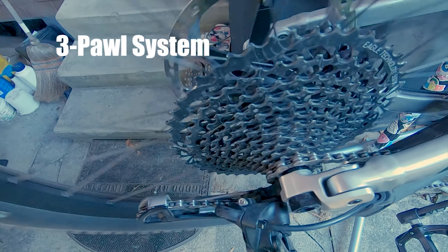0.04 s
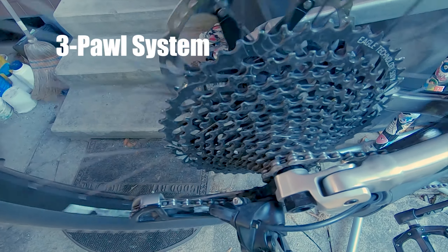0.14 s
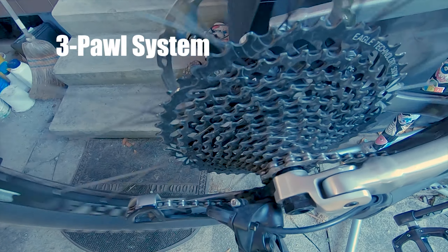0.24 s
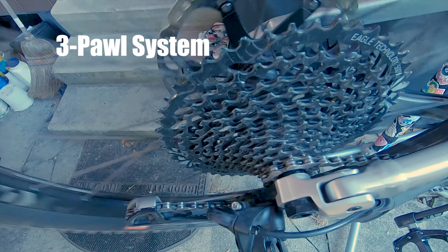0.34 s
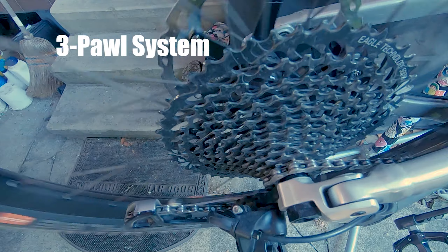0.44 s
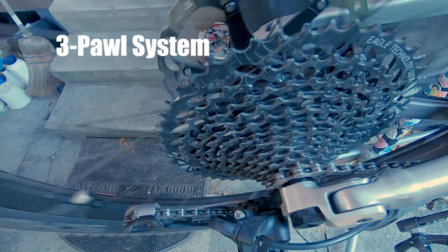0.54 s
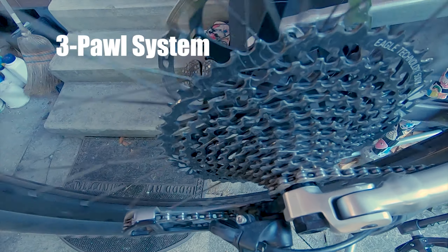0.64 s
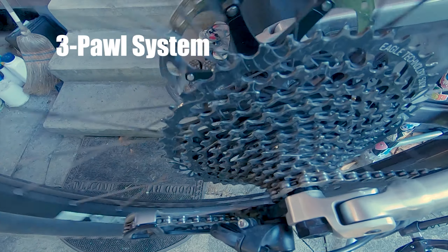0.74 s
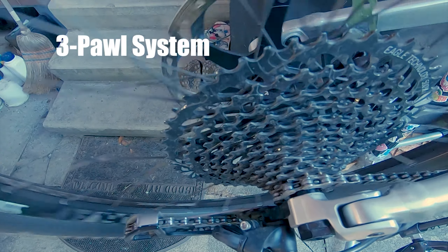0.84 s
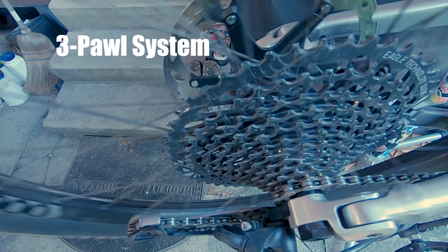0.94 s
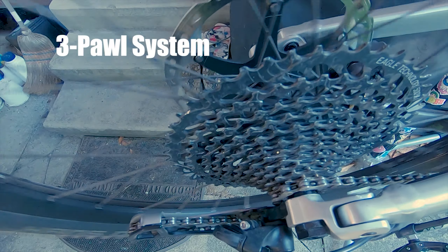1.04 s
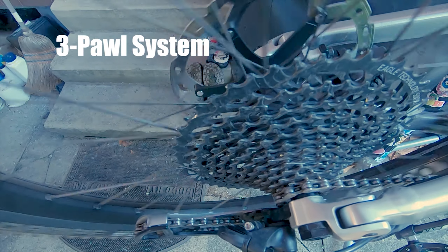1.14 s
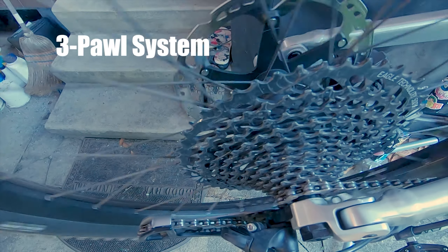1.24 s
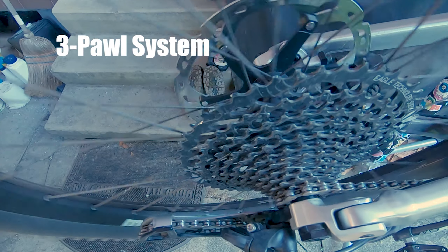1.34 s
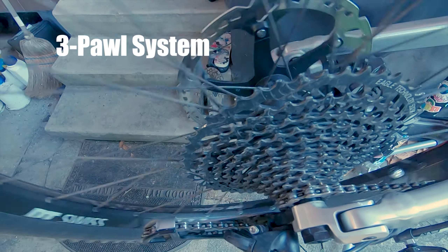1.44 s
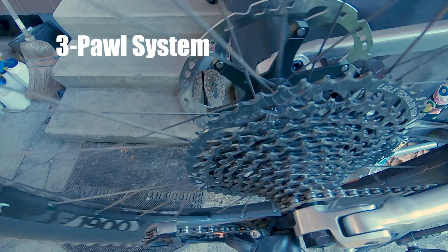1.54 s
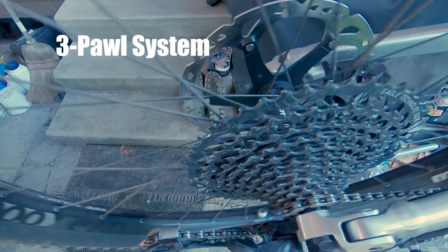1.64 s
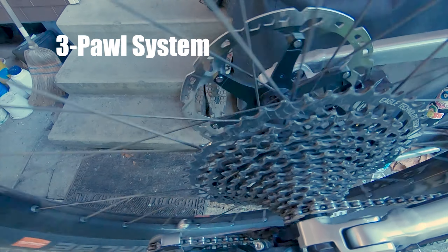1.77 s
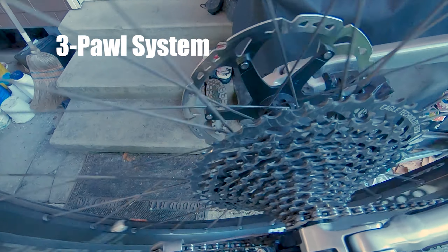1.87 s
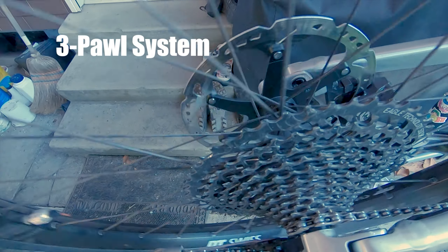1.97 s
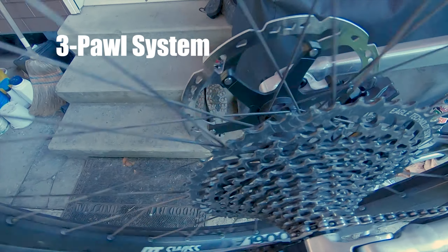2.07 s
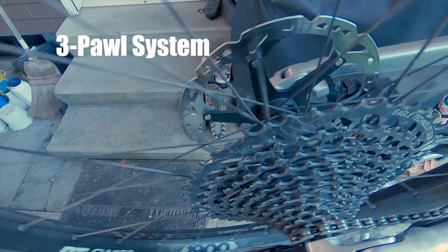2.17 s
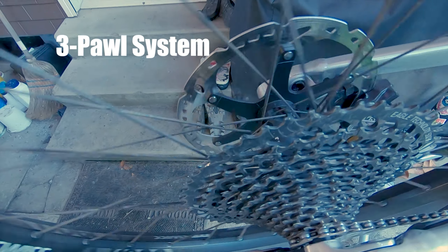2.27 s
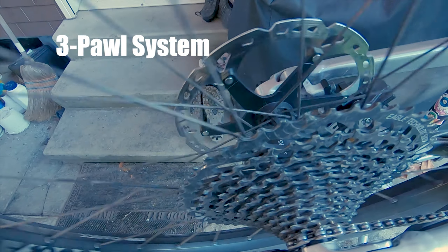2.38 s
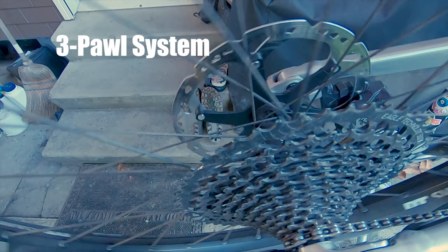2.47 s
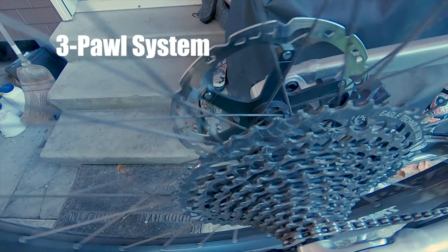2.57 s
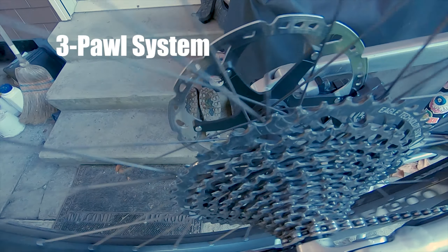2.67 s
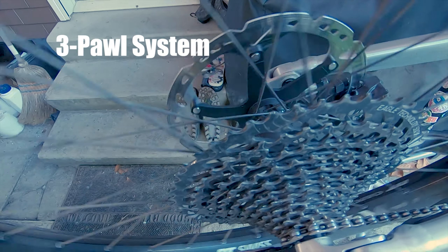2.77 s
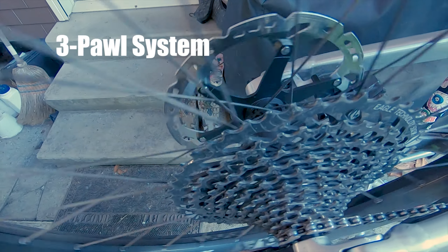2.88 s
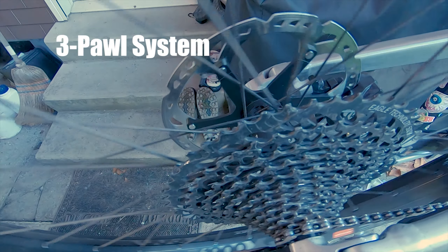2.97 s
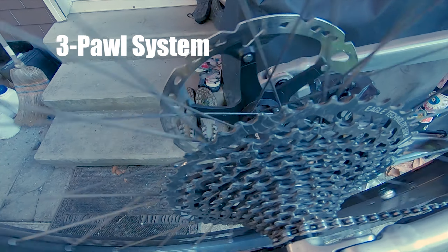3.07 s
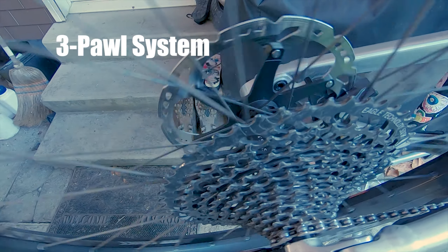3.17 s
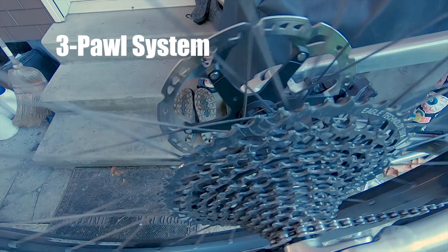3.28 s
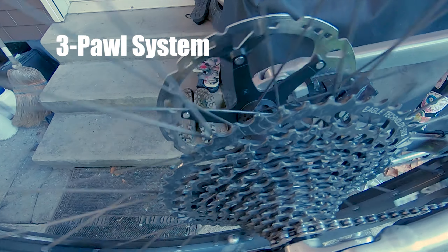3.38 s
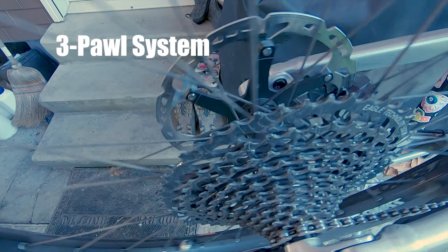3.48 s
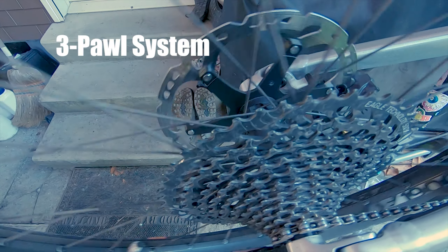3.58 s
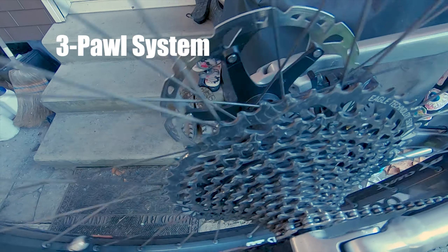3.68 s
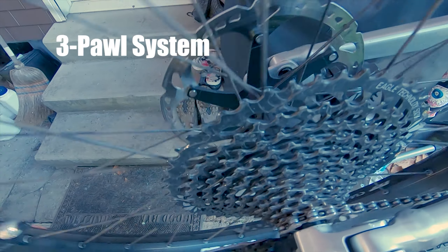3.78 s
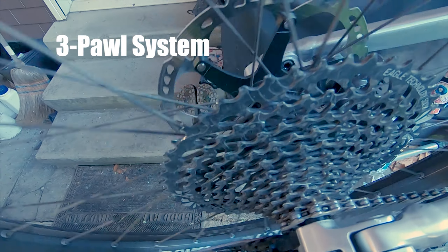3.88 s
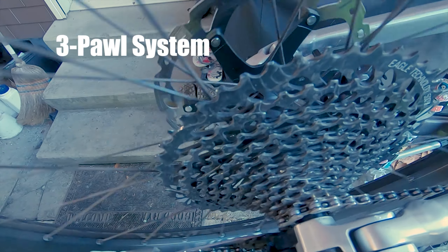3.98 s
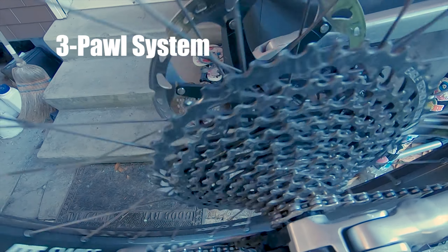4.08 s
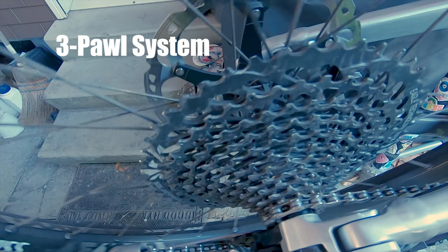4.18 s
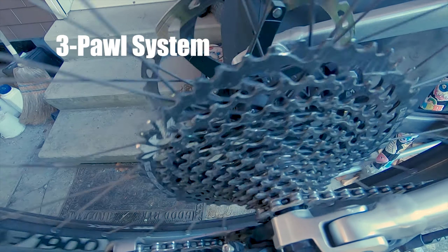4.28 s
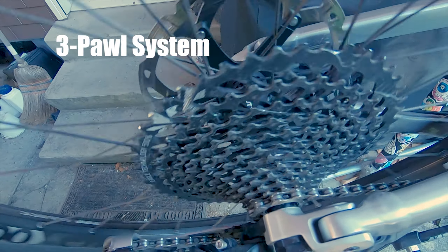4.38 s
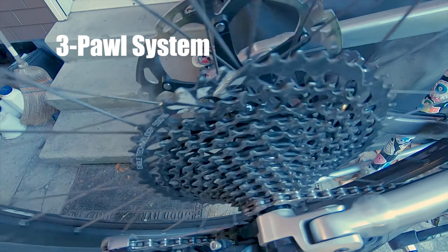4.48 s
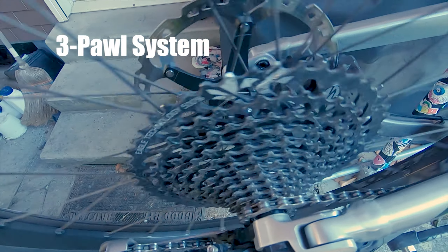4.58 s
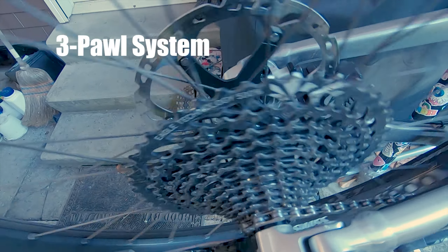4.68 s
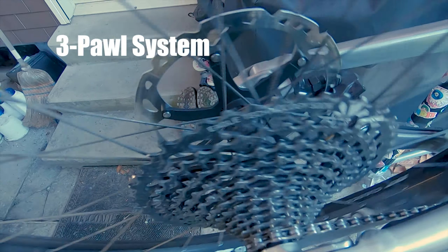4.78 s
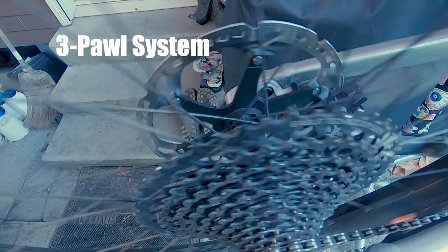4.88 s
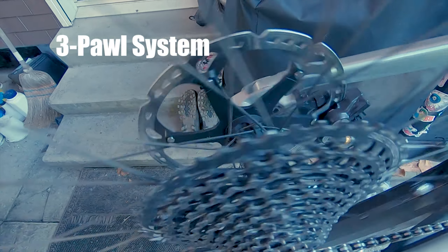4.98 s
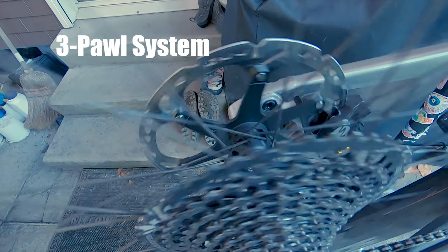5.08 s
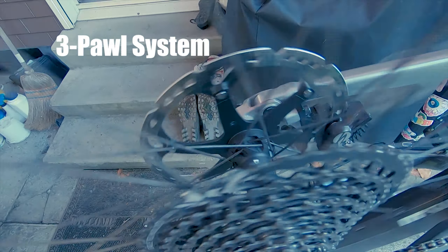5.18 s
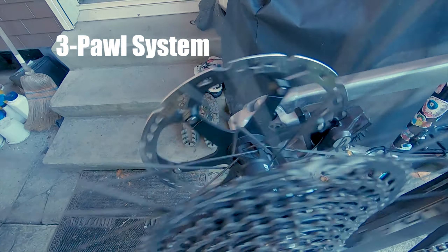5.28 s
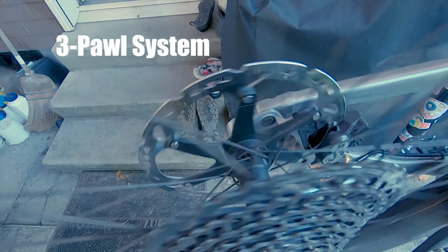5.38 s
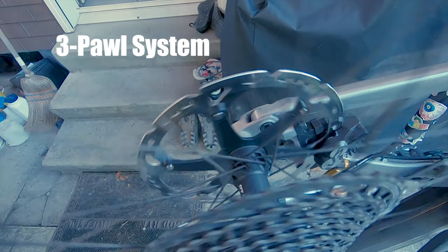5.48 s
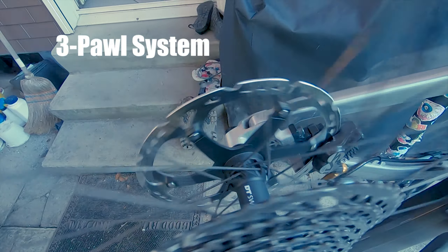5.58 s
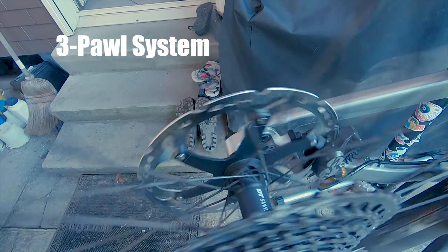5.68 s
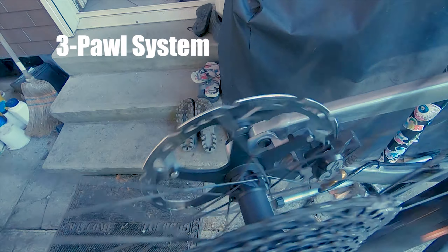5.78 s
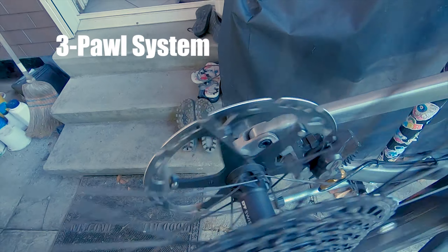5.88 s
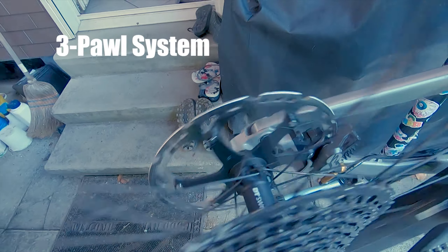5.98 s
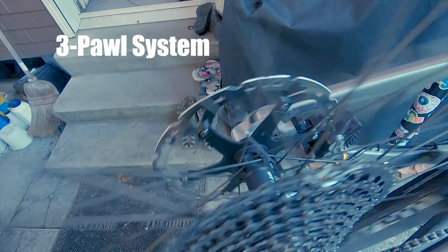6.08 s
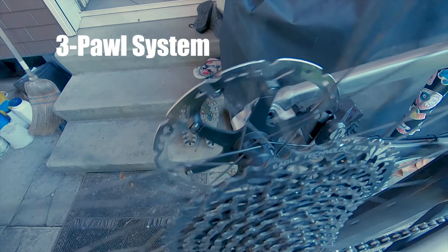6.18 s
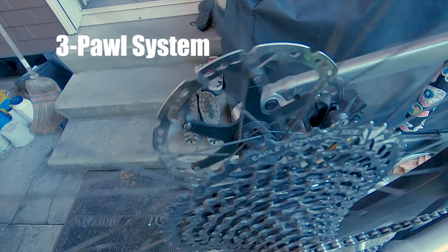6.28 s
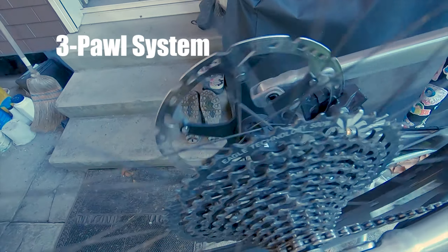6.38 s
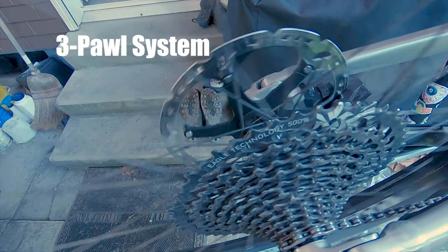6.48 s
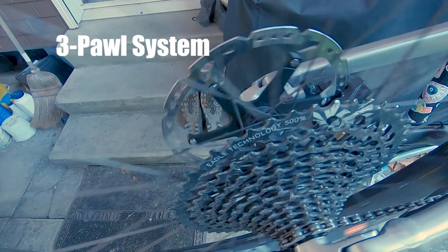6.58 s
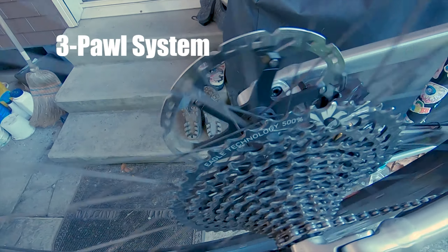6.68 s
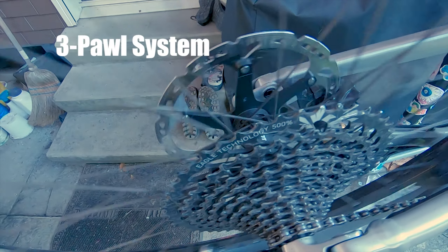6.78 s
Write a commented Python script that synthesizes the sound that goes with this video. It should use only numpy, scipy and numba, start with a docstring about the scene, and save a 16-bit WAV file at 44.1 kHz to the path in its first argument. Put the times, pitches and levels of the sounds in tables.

```python
"""Outdoors, a bicycle rear wheel freewheels close to a handheld camera: pawls snap and ring the wheel.
Fingers bump and rub the camera body; then the pedals drive the wheel, the chain ticks and rustles,
the frame rings low, and the hub freewheels again. Outdoor air, hum, a distant idling engine and wind
lie underneath. Hits start decaying tones and fading noise; air and wind are filtered noise.
Both channels hear almost the same."""
import sys
import numpy as np
from scipy import signal
from scipy.fft import rfft, irfft
from scipy.io import wavfile
from scipy.ndimage import uniform_filter1d
from numba import njit

SR = 44100
rng = np.random.default_rng(int(sys.argv[2]) if len(sys.argv) > 2 else 0)


def waveform_to_disk(signal):
    """Save audio, clipped to [-1, 1], as 16-bit WAV at the path in sys.argv[1]."""
    frames = np.transpose(np.atleast_2d(signal))
    scaled = np.clip(frames, -1, 1) * 32767
    samples = np.round(scaled).astype(np.int16)
    wavfile.write(sys.argv[1], SR, samples)


def how_loud(loudness_db):
    """Turn decibels into a plain amplitude multiplier (0 dB gives 1, 20 dB gives 10)."""
    steps = np.asarray(loudness_db, float) / 20
    return 10 ** steps


N = 301203
T = np.arange(N) / SR  # time in s

# four pitch regions of the wheel's sound: centre_hz, pawl_db, rattle_t60_s, rattle_db,
# ring_t60_s, ring_db, clear_modes_db (t60 is the time to fade by 60 dB)
REGIONS = [(2400, 9, 0.022, -7, 0.26, -6, -4.5), (4290, -1.5, 0.006, 2, 0.17, -10, -9.5),
           (7900, -5, 0.016, 0.5, 0.16, -2, -3), (11330, -24, 0.012, 2, 0.11, -3, -23)]
# random difference in colour from hit to hit
COLOUR_SCATTER_DB = 1.6


def curve(points):
    """Draw straight lines through a time table: one value per sample for each column."""
    s, *columns = np.transpose(points)
    return [np.interp(T, s, column) for column in columns]


def colour(x, points, weight=1):
    """Filter a sound by a table of pitch_hz, level_db, times an optional extra gain."""
    hz = np.fft.rfftfreq(N, 1 / SR) + 1
    point_hz, point_db = np.transpose(points)
    gain = how_loud(np.interp(np.log(hz), np.log(point_hz), point_db))
    return irfft(rfft(x) * gain * weight, N)


def unit(x):
    """Scale to an rms level of 1."""
    return x / np.sqrt(np.mean(x ** 2))


def decay(x, t60):
    """Each impulse starts an exponential fade that loses 60 dB in t60 seconds."""
    return signal.lfilter([1], [1, -np.exp(-np.log(1000) / (t60 * SR))], x)


def mode(x, hz, t60):
    """A resonance set ringing by x; it loses 60 dB in t60 seconds."""
    turn_and_fade = np.exp(2j * np.pi * hz / SR - np.log(1000) / (t60 * SR))
    return signal.lfilter([1], [1, -turn_and_fade], x + 0j).imag


def strikes(times, sizes):
    """Single-sample hits at the given times."""
    at = np.clip((np.asarray(times) * SR).astype(int), 0, N - 1)
    return np.bincount(at, sizes, N)


def walk(rate):
    """Random wandering: a new level rate times per second, smoothed twice."""
    k = int(SR / rate)
    steps = np.repeat(rng.standard_normal(N // k + 1), k)
    return uniform_filter1d(uniform_filter1d(steps, k), k)[:N]


def lines(table, waver_db, drift):
    """Steady tones (pitch_hz, level_db) that waver a little in level and phase."""
    out = 0
    for hz, db in table:
        level = how_loud(db + waver_db * walk(3.3))
        out = out + level * np.sin(2 * np.pi * hz * T + drift * walk(4))
    return out


def air():
    """Distant outdoor noise, hum and an idling engine; wind pushes on the microphone very low down."""
    # how loudly air and hum come through, dipping and rising: time_s, level_db
    air_level = [(0, -36.5), (.15, -44.5), (.6, -40.5), (1.15, -42), (1.2, -65), (1.45, -41.5), (1.9, -42),
                 (2.25, -46.5), (3, -45), (3.9, -42), (4.15, -44), (4.28, -40), (5, -38), (6.2, -37.5),
                 (6.41, -47), (6.83, -49)]
    # tone colour of the air: pitch_hz, relative level_db
    air_colour = [(18, 3.5), (30, 9.5), (65, -12.5), (113, -17), (176, -14), (445, -20), (959, -22.5),
                  (1460, -25.5), (2990, -31), (4330, -31), (5940, -38), (15000, -45.5), (16700, -59)]
    # hum: pitch_hz, level_db against the air
    hum_lines = [(70, -4), (137, -5.5), (155, -11.5)]
    # how loudly the distant engine comes through, before 3 dB is added: time_s, level_db
    idle_level = [(0, -51), (2, -56), (3.5, -46), (4.2, -45), (4.6, -35), (6.2, -38.5), (6.5, -45),
                  (6.83, -64)]
    # engine tones: pitch_hz, relative level_db
    idle_lines = [(104, -3), (208, -15)]
    # how loudly the wind comes through, before the chance gusts: time_s, level_db
    wind_level = [(0, -15), (.4, -39), (1.1, -41.5), (1.4, -58), (1.57, -10), (1.9, -42), (2.04, -20),
                  (2.25, -33.5), (3.5, -29), (3.95, -33.5), (4.5, -31.5), (5.3, -39.5), (5.8, -30),
                  (6.41, -24), (6.83, -27)]
    gust_db, gusts_per_s = 8.5, 4
    wind_colour = [(2, -3.5), (8, 0.0), (20, -12.5), (45, -28.0), (120, -40.0), (300, -62.5)]

    air_db = curve(air_level)[0]
    wind_db = curve(wind_level)[0] + gust_db * walk(gusts_per_s)
    far = unit(colour(rng.standard_normal(N), air_colour)) * how_loud(7.0 + 1.15 * walk(7.7))
    wind = unit(colour(rng.standard_normal(N), wind_colour))
    engine = how_loud(curve(idle_level)[0] + 3) * lines(idle_lines, 2., 1.5)
    hum = lines(hum_lines, 2.5, 3.)
    return how_loud(air_db) * (far + hum) + engine + how_loud(wind_db) * wind


def clicks():
    """One click for each tooth passed; every tooth differs a little in strength and colour."""
    # two freewheeling spells; a pawl drops at the first row and every tooth after: time_s, teeth_per_s
    coast = [(0.0064, 27.594), (0.213, 21.773), (0.358, 24.093), (0.525, 18.742), (0.525, 19.835),
             (1.124, 18.321), (1.368, 17.755), (1.998, 15.288), (2.885, 13.932), (3.466, 12.155),
             (3.672, 11.474), (4.017, 10.926), (4.13, 6.025)]
    coast_again = [(6.2961, 27.871), (6.354, 40.448), (6.46, 39.41), (6.471, 41.872), (6.569, 37.636),
                   (6.68, 30.129), (6.83, 30.115)]
    # how the clicks arrive, dipping after the bumps: time_s, level_db, low_region_db, middle_region_db
    arrival = [(0, 0, -18, -10.5), (.55, 1.5, -19.5, -14.5), (.8, 2, -14.5, -11.5), (1.16, 1, -21, -14.5),
               (1.2, -4.5, -19, -13), (1.3, -8, -20.5, -14), (1.5, -5.5, -16.5, -12.5),
               (1.76, 4, -21.5, -17.5), (1.85, -2.5, -17.5, -13), (1.95, -1.5, -25, -7.5),
               (2.3, 1, -22.5, -10.5), (2.9, 3, -24, -11.5), (3.3, 2, -22.5, -12), (4.13, 3, -22.5, -8),
               (6.29, 7, -20.5, -14), (6.45, -2, -25.5, -11), (6.6, -0.5, -21.5, -17),
               (6.83, -1.5, -25.5, -10)]
    # the two upper regions: level_db of each
    upper_regions_db = (-19, -15.5)
    tooth_scatter_db = .6

    s = []
    for spell in (coast, coast_again):
        inside = (T >= spell[0][0]) & (T <= spell[-1][0])
        teeth = np.cumsum(curve(spell)[0][inside]) / SR
        s += list(np.interp(np.arange(int(teeth[-1]) + 1), teeth, T[inside]))
    at = (np.array(s) * SR).astype(int)
    level_db, low_db, middle_db = (column[at] for column in curve(arrival))
    chance = rng.standard_normal((len(s), 5)).T
    regions_db = (low_db, middle_db, *upper_regions_db)
    coloured = [db + COLOUR_SCATTER_DB * c for db, c in zip(regions_db, chance[1:])]
    return np.array([s, level_db + tooth_scatter_db * chance[0], *coloured])


def many_modes(count, width_hz, scatter_db):
    """Gain over frequency of a thicket of narrow resonances: spokes, sprockets, disc."""
    hz = np.fft.rfftfreq(N, 1 / SR)
    chance = rng.random((count, 2))
    gain = np.full(len(hz), .05)
    for f, size in zip(1200 + 15000 * chance[:, 0], how_loud(scatter_db * chance[:, 1])):
        near = slice(int((f - 200) * N / SR), int((f + 200) * N / SR))
        gain[near] += size / (1 + ((hz[near] - f) / width_hz) ** 2)
    return gain


def struck(modes, region, s, size, scatter_db):
    """Ring the modes nearest to one region, each struck a little differently every time."""
    centres = np.log([r[0] for r in REGIONS])
    out = 0
    for hz, db, t60 in modes:
        if np.argmin(abs(np.log(hz) - centres)) == region:
            delay, strength, sign = rng.standard_normal((len(s), 3)).T
            size_here = size * how_loud(db + scatter_db * strength)
            # a light first touch, then the full blow a moment later
            touch = strikes(s - .0002, .3 * size_here)
            blow = strikes(s + .0007 + .0004 * abs(delay), size_here * np.sign(sign))
            out = out + mode(touch + blow, hz, t60)
    return out


def rattle(events, region, lag_s, late_db, t60, thicket=1):
    """Noise in the wheel's colour that starts at each hit, at its two bounces, and fades."""
    # tone colour of the wheel: pitch_hz, relative level_db
    wheel_colour = [(710, -47), (1200, -18.5), (1900, -15), (2340, -10), (2800, -5), (3970, -2.5),
                    (4380, 3.5), (5700, -11), (6080, -12.5), (6940, -10.5), (10400, -5), (11200, 1.5),
                    (12300, -8), (15600, -15.5), (16500, -66)]
    # event rows: time in s, level in dB, then the level in each region in dB
    s, size = events[0], how_loud(events[1] + events[2 + region])
    late = rng.random((len(s), 2)).T
    hits = strikes(s + 0.00071, size)
    for j in (0, 1):
        hits = hits + strikes(s + lag_s * (j + late[j]), size * how_loud(late_db))
    # each region fades into its neighbours
    log_hz = np.log(np.fft.rfftfreq(N, 1 / SR) + 1)
    share = np.interp(log_hz, np.log([r[0] for r in REGIONS]), np.eye(len(REGIONS))[region])
    noise = unit(colour(rng.standard_normal(N), wheel_colour, np.sqrt(share) * thicket))
    return uniform_filter1d(decay(hits, t60), size=30) * noise


def hub():
    """Each pawl snap is a short clack and rattle; then the whole wheel rings on."""
    # short modes of pawl and ratchet ring: pitch_hz, level_db, t60_s
    pawl_modes = [(2395, -23.5, 0.17), (2800, -13, 0.053), (3665, -6, 0.02), (4310, 0, 0.026),
                  (4463, -3, 0.032), (4877, -3.5, 0.018), (6640, -7.5, 0.072), (7640, -29, 0.022),
                  (8400, 2.5, 0.011), (11220, -10, 0.025), (11560, 20.5, 0.011), (13700, -18, 0.0056),
                  (16800, -17, 0.011)]
    # hub, sprocket and spoke modes that stand out: pitch_hz, level_db, t60_s
    hub_modes = [(2438, -18, 0.3), (2799, -5, 0.17), (2874, -10, 0.25), (3719, -13, 0.34),
                 (4252, -11, 0.33), (4419, -8, 0.25), (4947, -8, 0.21), (5092, -13, 0.3), (5516, 0, 0.13),
                 (5625, -18, 0.43), (5808, -20, 0.38), (6723, -15, 0.26), (7219, -12, 0.32),
                 (7332, -17, 0.49), (7412, -11, 0.34), (8123, -16, 0.25), (8833, -13, 0.27),
                 (8979, -9, 0.17), (9092, -7, 0.17), (9259, -7, 0.16), (9340, -4, 0.15), (9829, -18, 0.29),
                 (9937, -12, 0.26), (10039, -17, 0.33), (10879, -9, 0.16), (11536, -4, 0.15),
                 (12747, -20, 0.23), (13463, -17, 0.14), (14712, -20, 0.16), (14895, -19, 0.14)]
    # how much of the wheel's ring reaches the camera as it moves about: time_s, level_db
    facing = [(0, -5.5), (1.2, -9.3), (2.2, -5.7), (4.2, -6), (6.3, -6.5), (6.83, -8.5)]

    events = clicks()
    facing_db = curve(facing)[0]
    thicket = many_modes(count=320, width_hz=20., scatter_db=11.)
    out = 0
    for k, (hz, pawl_db, fast_t60, fast_db, ring_t60, ring_db, clear_db) in enumerate(REGIONS):
        size = how_loud(events[1] + events[2 + k])
        out = out + how_loud(pawl_db) * struck(pawl_modes, k, events[0], size, 2.)
        out = out + how_loud(clear_db + facing_db) * struck(hub_modes, k, events[0], size, 3.5)
        out = out + how_loud(fast_db) * rattle(events, k, .003, -9., fast_t60)
        out = out + how_loud(ring_db + facing_db) * rattle(events, k, .003, -20., ring_t60, thicket)
    # the wheel's sound is thinned below about 1.5 kHz
    return signal.sosfilt(signal.butter(2, 1500., "high", fs=SR, output="sos"), out)


def strokes():
    """Loudness of fingers sliding on the body: each stroke swells, holds and fades."""
    # strokes: start_s, length_s, level_db
    stroke_table = [(1.207, .09, -35), (1.363, 0.041, -32.5), (1.432, 0.036, -28.5), (1.497, 0.077, -22.5),
                    (1.574, 0.13, -30), (1.718, 0.093, -33), (2.011, 0.028, -31)]
    edge_s = .022
    out = 0
    for s, length, db in stroke_table:
        to_edge_s = np.minimum(T - s, s + length - T)
        out = out + how_loud(db) * np.clip(to_edge_s / edge_s + .5, 0, 1) ** 2
    return out


def handling():
    """Bumps flex the camera shell, mostly dropping in pitch as contact spreads; fingers stick and slip."""
    # bumps and creaks of the camera body:
    # start_s, level_db, first_pitch_hz, last_pitch_hz, time_to_peak_s, abruptness (no unit)
    bumps = [(1.1796, 10, 943, 99, 0.00367, 0.87), (1.2672, 0.5, 410, 303, 0.0024, 0.82),
             (1.364, -17.5, 610, 322, 0.0026, 2.4), (1.429, -9.5, 715, 269, 0.0019, 1.5),
             (1.47, -18.5, 60, 45, 0.0057, 2.1), (1.75, -19.5, 300, 152, 0.0039, 2.2),
             (1.822, -16, 294, 168, 0.0016, 2), (1.8542, -1.5, 616, 442, 0.0039, 6.1),
             (2.009, -27, 490, 513, 0.01, 1.4), (2.018, -23.5, 252, 237, 0.013, 1.8),
             (4.226, -22.5, 930, 520, 0.0018, 4.1)]
    # resonances of the body: pitch_hz, width_hz, relative level_db
    body = [(260, 220, 7), (532, 190, 12), (560, 97, -4), (1230, 2000, 0)]

    out = np.zeros(N)
    t = T[:SR // 8]
    for s, db, first_hz, last_hz, peak_s, abrupt in bumps:
        u = t / peak_s
        glide = (first_hz - last_hz) * peak_s * 0.71 * (1 - np.exp(-u))
        phase = 2 * np.pi * (last_hz * t + glide)
        swell = (u * np.exp(1 - u)) ** abrupt
        # the tone with a weak octave above and a stronger octave below
        tone = np.sin(phase) + 0.15 * np.sin(2 * phase) + 0.4 * np.sin(phase / 2)
        start = int(s * SR)
        out[start:start + len(t)] += how_loud(db) * swell * tone
    slips = rng.standard_normal(N) * how_loud(3. * walk(90))
    shell = 0
    for hz, width, db in body:
        t60 = np.log(1000) / np.pi / width  # a wider resonance fades faster
        shell = shell + how_loud(db) * unit(mode(slips, hz, t60))
    return out + strokes() * unit(shell)


def ticks():
    """Chain links and small parts tick while the wheel is driven; each has its level in every region."""
    # ticks: time_s, level_db, brightness_db
    tick_table = [(4.227, -20.5, -5), (4.4443, -23, -10), (4.6828, -31, -3), (4.845, -27, 0),
                  (4.861, -19.5, -0.5), (5.006, -26.5, -7), (5.0913, -24, -9), (5.222, -35, 3),
                  (5.2545, -33.5, 5), (5.44, -29, 4), (5.5278, -25, -5), (5.612, -37.5, 8),
                  (5.6968, -24, 5), (5.773, -31.5, 9.5), (5.806, -18, -12), (5.8566, -19.5, 5.5),
                  (5.927, -26, -6), (6.0086, -24, 3.5), (6.082, -29.5, 4.5), (6.164, -37.5, 10),
                  (6.2267, -36.5, 11.5)]
    # colour of a tick in each region: level_db, share of the brightness (no unit)
    tick_colour = [(-14.5, 0.73), (-14.5, 0.32), (-19, 1.3), (-24, 1.77)]
    s, level_db, bright_db = np.transpose(tick_table)
    chance = rng.standard_normal((len(s), 4)).T
    regions_db = []
    for (db, share), c in zip(tick_colour, chance):
        regions_db.append(db + share * bright_db + COLOUR_SCATTER_DB * c)
    return np.array([s, level_db, *regions_db])


def chain():
    """Dry ticks of fading noise over a grainy rustle of links."""
    # level of the rustle: time_s, level_db
    rustle_level = [(4.15, -59), (4.3, -61), (5.0, -56), (5.5, -53), (6.25, -48.5), (6.35, -79)]
    rustle_colour = [(1500, -14.5), (2500, -4), (4400, 15.0), (5500, 11.0), (6200, -20),
                     (10000, 7), (16000, -48.0)]
    events = ticks()
    dry_ticks = sum(rattle(events, k, 0.012, -28, 0.095) for k in range(len(REGIONS)))
    grains = rng.standard_normal(N) * how_loud(5. * walk(220))
    return dry_ticks + how_loud(curve(rustle_level)[0]) * unit(colour(grains, rustle_colour))


def frame():
    """The pawls catch as the drive takes hold, and the frame tubes ring low."""
    # modes of the frame: pitch_hz, level_db, t60_s
    frame_modes = [(283, -33, .6), (478, -43, .7), (534, -37, 1.1)]
    take_up_s = 4.232
    return sum(how_loud(db) * mode(strikes([take_up_s], [1.]), hz, t60) for hz, db, t60 in frame_modes)


def scene():
    """All sources together; a very faint side signal keeps the two channels from being identical."""
    mid = hub() + chain() + handling() + frame() + air()
    side_colour = [(30, -36), (300, -34), (1000, -27), (4000, -32.5), (12000, -29.5)]
    side = colour(mid, side_colour) * walk(190)
    return np.array([mid + side, mid - side])


@njit
def limiter_gain(x, top, attack, release):
    """Follow the peaks; turn down whatever would pass the top."""
    gain, e = np.empty(len(x)), 0.
    for i in range(len(x)):
        e += (abs(x[i]) - e) * (attack if abs(x[i]) > e else release)
        gain[i] = min(1., top / (e + 1e-9))
    return gain


def low_pass(x):
    """Removes everything above the highest recorded frequency."""
    return signal.sosfilt(signal.butter(12, 16820, fs=SR, output="sos"), x)


def record(dry):
    """A limiter ducks after the loudest blows, too late to save their first swings; the top is cut."""
    # attack 2.5 ms, release 40 ms
    held = dry * limiter_gain(dry[0], 0.8, 1 / (0.0025 * SR), 1 / (0.04 * SR))
    clipped = np.clip(held, -1, 1)
    top_cut = signal.ellip(10, .2, 70, 16400, fs=SR, output="sos")  # low-pass at 16400 Hz
    mix = np.clip(signal.sosfilt(top_cut, clipped), -1, 1)
    return low_pass(mix)


dry = scene()
out = record(dry)
waveform_to_disk(out)
```